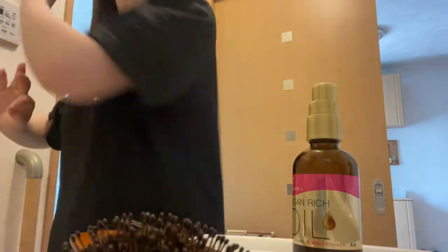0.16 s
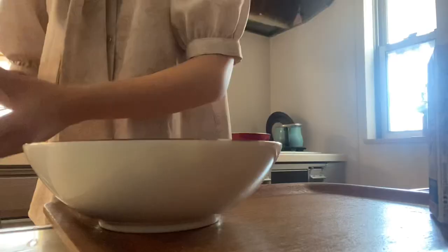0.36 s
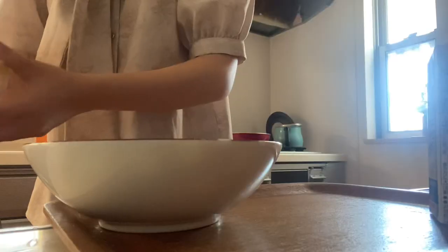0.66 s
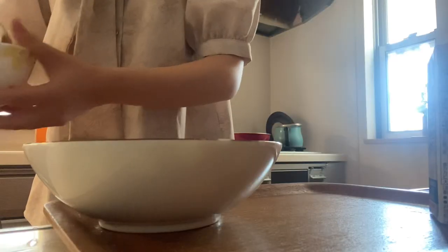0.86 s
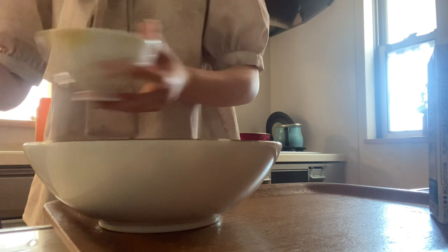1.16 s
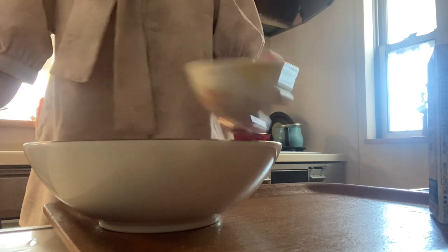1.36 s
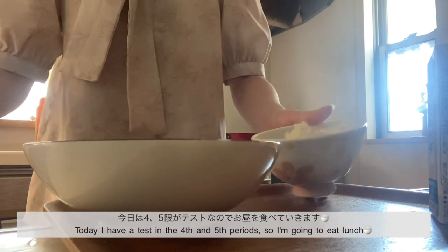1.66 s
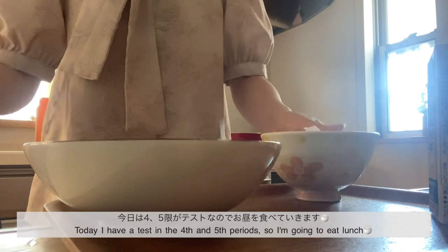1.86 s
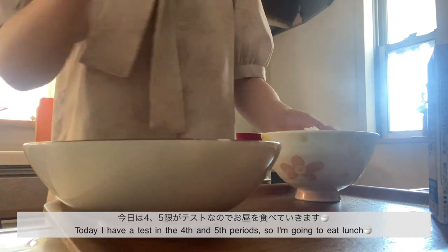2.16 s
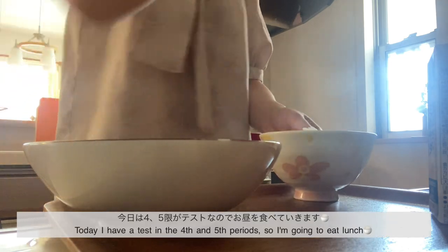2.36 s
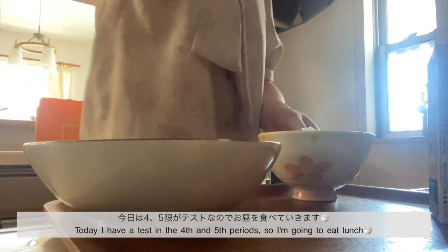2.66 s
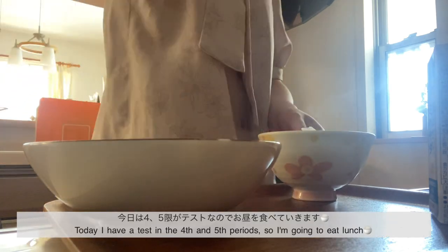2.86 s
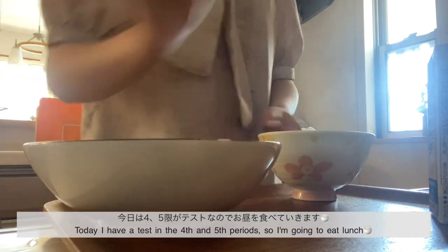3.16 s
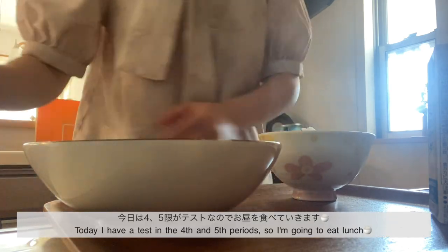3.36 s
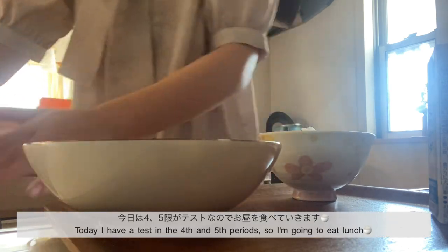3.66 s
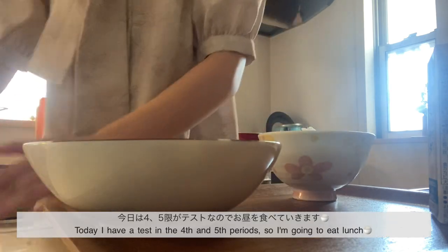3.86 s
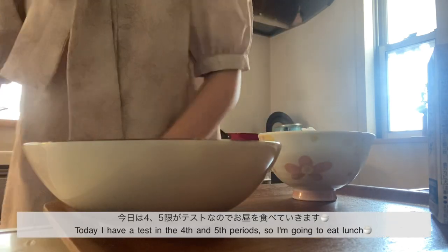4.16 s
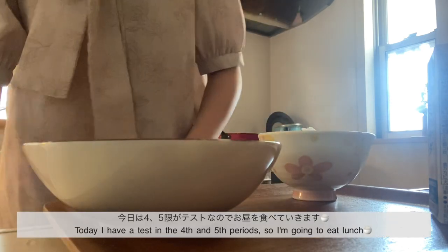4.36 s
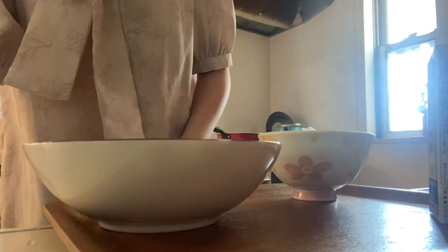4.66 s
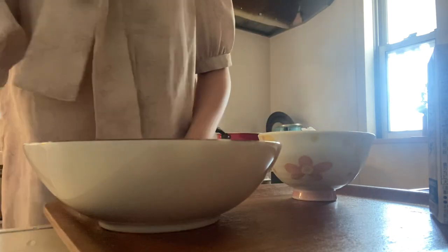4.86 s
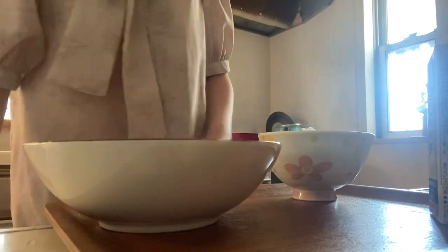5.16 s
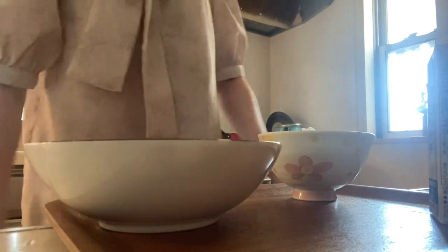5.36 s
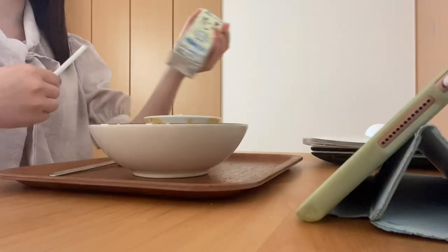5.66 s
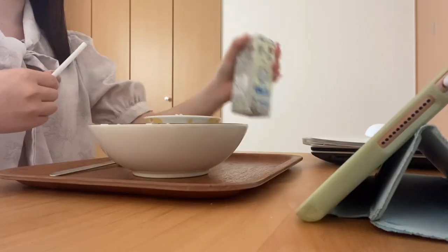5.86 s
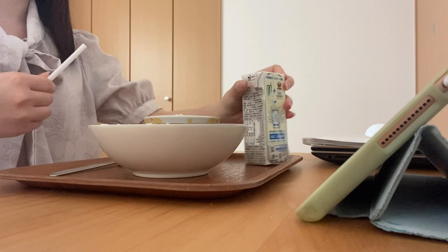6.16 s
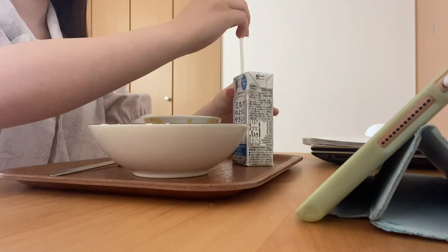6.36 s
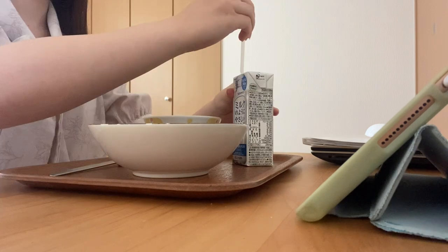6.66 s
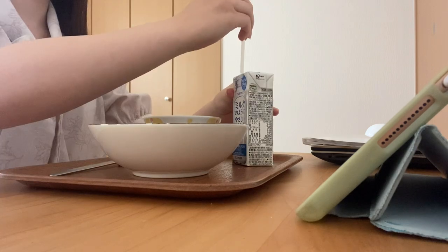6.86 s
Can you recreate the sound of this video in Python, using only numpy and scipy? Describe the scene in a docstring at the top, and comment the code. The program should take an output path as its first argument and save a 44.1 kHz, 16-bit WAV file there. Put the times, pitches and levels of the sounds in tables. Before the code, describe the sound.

Over a low microwave hum, a ceramic bowl knocks onto a counter, tableware clacks, things clatter further off; then quiet, straw clicks, a carton landing.

```python
"""Cloth rustles over quiet room noise; after a hard cut a microwave oven hums, and after a second the hum is gone.
During the hum a bowl is set on a counter, tableware is put down and things clatter further off; after it
a straw clicks and a drink carton lands on a tray, scuffs and rocks to rest, over faint ticking.
Air and cloth are shaped noise, the hum is sums of tones, and each blow is a noise crack plus damped modes;
sliding is a dense train of tiny blows, and a diffuse decaying tail forms the reverberation."""
import sys
import numpy as np
from scipy import signal
from scipy.fft import rfft, irfft, next_fast_len
from scipy.io import wavfile
from scipy.ndimage import uniform_filter1d

SR = 44100
rng = np.random.default_rng(int(sys.argv[2]) if len(sys.argv) > 2 else 0)


def materialize(psi):
    """Save the field psi as 16-bit PCM at rate SR to the path in sys.argv[1].

    A 1-D psi becomes a single channel; in a 2-D psi each row is a channel.
    """
    bounded = np.clip(np.atleast_2d(psi).T, -1, 1)
    quanta = np.round(bounded * 32767).astype(np.int16)
    wavfile.write(sys.argv[1], SR, quanta)


N = 309141
TIME = np.arange(N) / SR
RING_TIME = TIME[:16384]
THIRD_OCTAVES_HZ = 25 * 2 ** (np.arange(29) / 3)
FLAT = [(1, 0), (SR, 0)]  # white spectrum: frequency_hz, density_db


def amp(db):
    """Logarithmic level: decibels to amplitude gain."""
    return 10 ** (np.asarray(db) / 20)


def at_hz(table, hz):
    """Logarithmic frequency scale: interpolate a table along it."""
    table_hz, value = np.transpose(table)
    return np.interp(np.log(np.maximum(hz, 1)), np.log(table_hz), value)


def unit(x):
    """Power normalisation: scale to rms 1."""
    return x / np.sqrt(np.mean(x ** 2))


def pan(db):
    """Interaural level difference: gains for left minus right in dB."""
    return amp(np.array([[db], [-db]]) / 2)


def lean(x, pan_db):
    """Frequency-dependent level difference: full below 700 Hz, nearly none in the treble."""
    n = next_fast_len(N)
    lean_db = pan_db * at_hz([(700, 1.0), (6000, 0.084)], np.fft.rfftfreq(n, 1 / SR))
    gains = amp(np.array([lean_db, -lean_db]) / 2)
    return irfft(rfft(x, n) * gains, n)[:, :N]


def walk(rate):
    """Low-pass random process: a smooth wander from about rate new values a second, spread near 1."""
    k = int(SR / rate)
    steps = np.repeat(rng.standard_normal(N // k + 1), k)
    return 1.3 * uniform_filter1d(uniform_filter1d(steps, k), k)[:N]


def swell(s, rise_s, fall_s):
    """Exponential growth and decay: a movement gathers speed up to time s, then comes to rest."""
    return np.exp(-np.abs(TIME - s) / np.where(TIME < s, rise_s, fall_s))


def air(spectrum, size, port_lag_s=0.0016):
    """Diffuse-field coherence: channels alike in the bass, partly opposed in the middle, unrelated above."""
    n = next_fast_len(size)
    hz = np.fft.rfftfreq(n, 1 / SR)
    mid, side = rfft(rng.standard_normal((2, n)))
    alike = np.clip(np.sinc(2 * hz * port_lag_s) * 2.0, -.95, .97)
    mid = mid * np.sqrt(np.abs(1 + alike))
    side = side * np.sqrt(np.abs(1 - alike))
    colour = amp(at_hz(spectrum, hz))
    return unit(irfft(np.array([mid + side, mid - side]) * colour, n)[:, :size])


def beam(size, lag_s, direct=0.65):
    """Interaural time difference: white noise leads by lag_s on the left, mixed with a diffuse part."""
    hz = np.fft.rfftfreq(size, 1 / SR)
    phase = np.exp(1j * np.pi * hz * lag_s * np.array([[1], [-1]]))
    straight = irfft(rfft(rng.standard_normal(size)) * phase, size)
    return np.sqrt(direct) * straight + np.sqrt(1 - direct) * air(FLAT, size)


def dying_noise(white, spectrum, t60s):
    """Frequency-dependent damping: noise of energy 1 whose third-octave bands die at their own pace."""
    t = TIME[:white.shape[1]]
    hz = np.maximum(np.fft.rfftfreq(len(t), 1 / SR), 1)
    noise, colour, out = rfft(white), amp(at_hz(spectrum, hz)), 0
    for centre in THIRD_OCTAVES_HZ[2:]:
        octaves_off = np.abs(np.log2(hz / centre))
        window = colour * np.sqrt(np.maximum(1 - octaves_off * 3, 0))
        band = irfft(noise * window, len(t)) * amp(-60 * t / at_hz(t60s, centre))
        # restore each band's share of the spectrum after the decay
        out = out + unit(band) * np.linalg.norm(window)
    return unit(out) / np.sqrt(len(t))


def ring(modes, scatter_db=2.5, opposed_hz=320, turn=1.865):
    """Modal superposition: damped modes of energy 1, with a channel phase lag growing to turn radians."""
    bloom_cycles = 1.2  # time constant of a mode's build-up, so the lows arrive late
    out = 0
    for (hz, db, t60), chance in zip(modes, rng.standard_normal((len(modes), 2))):
        lag = turn * min(hz / opposed_hz, 1) ** 2 * np.array([[.5], [-.5]])
        wave = np.sin(2 * np.pi * hz * (1 + 0.0019 * chance[0]) * RING_TIME - lag)
        decay = amp(db + scatter_db * chance[1] - 60 * RING_TIME / t60)
        bloom = 1 - np.exp(-RING_TIME * hz / bloom_cycles)
        out = out + wave * decay * bloom
    return unit(out) / np.sqrt(len(RING_TIME))


def blows(table, crack, support, modes=None, ring_db=0, low_t60=0.17, high_t60=0.041,
          rise_s=0.00057, lag_s=0, grain_db=4.0):
    """Impact excitation: crack, object ring and support thump, dulled by soft contact.

    Returns the direct sound and what enters the room."""
    ring_to_room_db = -10.5  # an object's ring fills the room less than its crack
    size = len(RING_TIME)
    out = np.zeros((2, 2, N + size))
    # the room answers a crack as it would one clean click, with an even wash
    pulse = irfft(amp(at_hz(crack, np.fft.rfftfreq(size, 1 / SR))))
    click = unit(np.roll(pulse, 128)) / np.sqrt(size)
    for s, db, contact_hz, thump_db in table:
        noise = dying_noise(beam(size, lag_s), crack, [(250, low_t60), (4000, high_t60)])
        # after the first clean contact the surfaces chatter, so the crack comes in grains
        chatter = amp(grain_db * walk(900)[:size] * (1.0 - np.exp(-RING_TIME / 0.02)))
        grains = unit(noise * chatter) / np.sqrt(size)
        thump = amp(thump_db) * ring(support)
        tone = 0 if modes is None else amp(ring_db) * ring(modes)
        direct = (grains + thump + tone) * (1 - np.exp(-RING_TIME / rise_s))
        radiated = click + thump + amp(ring_to_room_db) * tone
        softness = signal.butter(1, min(contact_hz, SR * .45), fs=SR)
        start = int(s * SR)
        out[..., start:start + size] += amp(db) * signal.lfilter(*softness, [direct, radiated])
    return out[..., :N]


def follow_ups(table, delay_s, db, crispness, thump_db, growth=1.8):
    """Nonlinear rebound: a second contact after each blow, strong after hard ones, slight after light."""
    hardest = max(row[1] for row in table)
    return [(s + delay_s, hardest + db + growth * (blow_db - hardest), crispness * contact_hz, thump_db)
            for s, blow_db, contact_hz, _ in table]


def rattles(table, gap_s, db, step_db, count):
    """Repeated lossy impact: loose things chatter at uneven gaps, each contact weaker than the last."""
    chance = rng.uniform(.5, 1.5, (len(table), count))
    return [(s + delay, blow_db + db + k * step_db, contact_hz, thump_db)
            for (s, blow_db, contact_hz, thump_db), gaps in zip(table, chance)
            for k, delay in enumerate(gap_s * np.cumsum(gaps))]


def scrape(crack, modes, rate, ring_db, spread_db=1.9):
    """Stick-slip friction: uneven catches, rate per second on average, each a crack that rings the object."""
    catch_t60_s = 0.023
    size_db = spread_db * np.minimum(rng.exponential(size=N), 4)
    catches = (rng.random(N) < rate / SR) * amp(size_db)
    noise = dying_noise(air(FLAT, len(RING_TIME)), crack, [(1, catch_t60_s)])
    grain = noise + amp(ring_db) * ring(modes)
    return unit(signal.fftconvolve(catches[None], grain, axes=1)[:, :N])


# Reverberation time of the room: frequency_hz [Hz], t60_s [s]
REVERBERATION = [(100, 0.49), (500, 0.29), (2300, 0.39), (6000, 0.35), (14000, 0.12)]


def room(sound, wet_db, bass_db):
    """Reverberation: direct sound plus a diffuse tail that builds over the first wall echoes."""
    direct, radiated = sound
    t = TIME[:32768]
    tail = dying_noise(air(FLAT, len(t)), [(100, bass_db), (1000, 0.0022)], REVERBERATION)
    tail = tail * (1 - np.exp(-t / 0.0016))
    return direct + amp(wet_db) * signal.fftconvolve(radiated, tail, axes=1)[:, :N]


# Noise spectrum of the first room: frequency_hz [Hz], relative density_db [dB per Hz]
FIRST_ROOM_NOISE = [(30, -15.5), (81, 2.5), (171, -10), (735, -4), (1480, -22.5), (8690, -38.5),
                    (15000, -74)]


def first_room():
    """Stationary broadband noise: the room tone before the hum."""
    return amp(-49.5) * air(FIRST_ROOM_NOISE, N) * pan(-2.6)


# Noise spectrum of the last room: frequency_hz [Hz], relative density_db [dB per Hz]
LAST_ROOM_NOISE = [(30, -7), (80, -9), (135, -2), (175, -13), (240, -12.5), (420, -13.5), (700, -27),
                   (1200, -35.5), (1900, -40.5), (4300, -58), (4800, -38), (5500, -67), (15000, -73.5)]


def last_room():
    """Stationary broadband noise: the fainter room tone after the hum."""
    return amp(-61.5) * air(LAST_ROOM_NOISE, N) * pan(-9.5)


# Transformer tones: pitch_hz [Hz], rms level_db before panning [dB], left minus right pan_db [dB]
TRANSFORMER_TONES = [(60.6, -40.5, -1.55), (237.5, -52.5, -7)]
# Fan tones: pitch_hz [Hz], rms level_db before panning [dB], left minus right pan_db [dB], unsteadiness [0-1]
FAN_BLADE_TONES = [(150, -51, -8.5, .4), (170, -40, -6.5, .12), (343, -53.5, 7, 1)]
# Fan air with a narrow treble whistle: frequency_hz [Hz], relative density_db [dB per Hz]
FAN_AIR = [(25, -36.5), (45, -15), (105, -9), (130, -3), (215, -1.5), (285, -8), (350, -3.5), (420, -11),
           (540, -11.5), (950, -20.5), (1600, -28), (2090, -36), (2235, -23.5), (2390, -34.5), (3700, -41),
           (6000, -55.5), (15000, -70.5)]


def microwave():
    """Tonal and flow noise: steady mains hum and fluttering, drifting fan tones over the rush of air."""
    fan_drift, hum_lead_s = .006, 0.0001  # share of fan speed; the tones reach the left channel first
    out = amp(-43.5) * air(FAN_AIR, N) * pan(-3.0) * amp(1.2 * walk(8.3))
    clock = TIME + hum_lead_s * np.array([[1], [0]])
    for hz, db, pan_db in TRANSFORMER_TONES:
        tone = np.cos(2 * np.pi * (hz * clock + rng.random()))
        out = out + amp(db) * unit(tone) * pan(pan_db)
    fan_clock = clock + np.cumsum(fan_drift * walk(2)) / SR
    for hz, db, pan_db, unsteady in FAN_BLADE_TONES:
        flutter = 1 + unsteady * (walk(hz / 10) + 1j * walk(hz / 10))
        tone = np.real(flutter * np.exp(2j * np.pi * (hz * fan_clock + rng.random())))
        out = out + amp(db) * unit(tone) * pan(pan_db)
    return out


# Runs of even ticks: start_s [s], end_s [s], relative level_db before tick shape and scatter [dB]
TICKS = [(5.614, 6.41, -63), (6.413, 6.98, -65)]


def ticking(hz=1900, rise_s=0.0043):
    """Amplitude modulation of band noise: faint soft-edged ticks, eight a second, of uneven strength."""
    rate_hz = 8
    ticks = [(s, db) for first, end, db in TICKS for s in np.arange(first, end, 1 / rate_hz)]
    times, db = np.transpose(ticks)
    age = np.maximum(TIME[:, None] - times, 0) / rise_s
    strength = amp(db + 2 * rng.standard_normal(len(db)))
    envelope = np.sum(strength * age * np.exp(-age), axis=1)
    # the doubled point makes a sudden step down above hz
    spectrum = [(hz / 2, -18), (hz * 0.87, -7), (hz, 0), (hz * 1.0, -11), (hz * 2, -32)]
    return envelope * air(spectrum, N)


# Arm movements brushing sleeves and apron: fastest_s [s], level_db before flicker [dB], rise_s [s], fall_s [s]
ARM_STROKES = [(.3, -65.5, 0.054, 0.037), (1.129, -76.5, 0.049, 0.14), (2.236, -62, 0.03, 0.042),
               (3.481, -74, 0.15, 0.1)]


def cloth():
    """Friction noise: fabric hisses in small uneven catches, swelling with each arm movement."""
    rest_db = -84  # fabric stirring between the movements
    strokes = sum(amp(db) * swell(s, rise_s, fall_s) for s, db, rise_s, fall_s in ARM_STROKES)
    motion = amp(rest_db) + strokes
    hiss = air([(500, -18.0), (2000, -1.0), (8500, 1), (15000, -25)], N)
    return motion * amp(2 * walk(35)) * hiss


# Crack of far surfaces: frequency_hz [Hz], relative density_db [dB per Hz]
FAR_SURFACE_CRACK = [(100, -5.5), (350, 3.5), (550, 3.5), (700, 1), (1000, 7.5), (1350, 6), (1700, -2.5),
                     (2200, 1.5), (2900, -5.5), (7000, -9), (13500, -14), (15300, -20)]
# Modes of the dragged thing: pitch_hz [Hz], relative level_db [dB], t60_s [s]
SLIDER_MODES = [(1280, 0, 0.024), (1490, -1, 0.016)]


def shelf_slide():
    """Stick-slip friction: one push drags something over a shelf, faster until it is stopped."""
    push = amp(-45.5) * swell(4.765, rise_s=0.2, fall_s=0.046)
    return push * scrape(FAR_SURFACE_CRACK, SLIDER_MODES, rate=1200, ring_db=4.5)


# Blow columns below: start_s, level_db before the source's gain, contact_hz (low-pass), thump_db re the blow.
# Knocks on the shelf: start_s [s], level_db [dB], contact_hz [Hz], thump_db [dB]
SHELF_KNOCKS = [(3.832, -18.5, 1800, 5.5), (4.206, -4.5, 3500, 4.5), (4.283, -16.5, 5000, -4),
                (4.697, -21, 6000, 13), (4.7631, -1, 18100, -1), (4.824, -18, 2500, 0),
                (4.855, -5, 5100, 2.5), (4.888, -13, 119, 16), (5.059, -18, 3000, -8)]
# Thin clicks: start_s [s], level_db [dB], contact_hz [Hz], thump_db [dB]
THIN_CLICKS = [(3.654, -37.5, 5000, -17), (4.54, -21.5, 4900, -1)]
# Blow on a hollow vessel: start_s [s], level_db [dB], contact_hz [Hz], thump_db [dB]
VESSEL_KNOCKS = [(4.351, -10.5, 900, 2)]
# Modes of things on the shelf: pitch_hz [Hz], relative level_db [dB], t60_s [s]
SHELF_MODES = [(544, 4, 0.12), (967, -2, 0.091), (1334, -1, 0.038), (1455, -4, 0.046)]
# Modes of the hollow vessel: pitch_hz [Hz], relative level_db [dB], t60_s [s]
VESSEL_MODES = [(924, -1, 0.27), (1136, 0, .1)]
# Modes of the supporting cabinet: pitch_hz [Hz], relative level_db [dB], t60_s [s]
CABINET_MODES = [(89, -4, 0.15), (128.8, -3.5, 0.13), (160.2, -1.5, 0.088), (220.5, 0.5, 0.065),
                 (351, -9.5, 0.15)]
# Crack of thin plastic, also used by the straw: frequency_hz [Hz], relative density_db [dB per Hz]
PLASTIC_CRACK = [(200, 4), (2200, -2.5), (7000, 2), (13000, -3.5), (16000, -5)]


def clatter():
    """Reverberant impacts: far things knock and rattle with strong room sound; a hollow vessel rings."""
    hard = [row for row in SHELF_KNOCKS if row[1] > -7.5]  # dB; only these shake loose things
    loose = rattles(hard, gap_s=.011, db=-8.5, step_db=-2.5, count=3)
    knocks = blows(SHELF_KNOCKS + loose, FAR_SURFACE_CRACK, CABINET_MODES, SHELF_MODES, ring_db=-1.5,
                   low_t60=0.14, high_t60=0.041, rise_s=0.00093, lag_s=0.000688, grain_db=5.5)
    vessel = blows(VESSEL_KNOCKS, FAR_SURFACE_CRACK, CABINET_MODES, VESSEL_MODES, ring_db=1.5)
    clicks = blows(THIN_CLICKS, PLASTIC_CRACK, CABINET_MODES)
    return amp(8.0) * lean(room(knocks + vessel + clicks, wet_db=-3.0, bass_db=-2.5), pan_db=-2.5)


# Clicks of the straw: start_s [s], level_db [dB], contact_hz [Hz], thump_db [dB]
STRAW_SNAPS = [(5.472, -7.5, 15300, -33), (5.581, -12.5, 18100, -22), (5.591, -35, 18000, -22),
               (5.881, -23.5, 6900, -20)]
# Modes of the tray, also under the carton: pitch_hz [Hz], relative level_db [dB], t60_s [s]
TRAY_MODES = [(47.6, 1, 0.16), (67.4, -13, 0.19), (117, 3, 0.072), (137.3, -2.5, 0.11)]


def straw():
    """Short broadband transients: the drinking straw snaps out in crisp clicks."""
    clicks = blows(STRAW_SNAPS, PLASTIC_CRACK, TRAY_MODES, low_t60=0.018, high_t60=0.0087, rise_s=0.00027)
    return amp(-8.5) * room(clicks, wet_db=-2.0, bass_db=-5.0)


# Contacts of carton and tray: start_s [s], level_db [dB], contact_hz [Hz], thump_db [dB]
CARTON_KNOCKS = [(6.027, -12.5, 4440, -10), (6.075, -30.5, 600, 12.5), (6.169, -29.5, 2200, 9),
                 (6.206, -33, 5000, 4), (6.217, -42, 1503, 24), (6.275, -40, 30, 17.5),
                 (6.364, -56, 3000, -10)]
# Modes of the carton: pitch_hz [Hz], relative level_db [dB], t60_s [s]
CARTON_MODES = [(403.4, 3.5, .075), (640, 2.5, 0.015), (840, -3, 0.051), (1330, -11, 0.047),
                (2360, -14, 0.032)]
# Crack of the sliding carton: frequency_hz [Hz], relative density_db [dB per Hz]
SCUFF_NOISE = [(100, 2), (400, 10), (950, -11), (2400, -35), (15000, -49)]


def carton_scuff():
    """Stick-slip friction: the landed carton scuffs over the tray in small catches until it stands."""
    drag = swell(6.17, rise_s=0.17, fall_s=0.06) * (TIME > CARTON_KNOCKS[0][0])
    return amp(-38) * drag * scrape(SCUFF_NOISE, CARTON_MODES, rate=1400, ring_db=2) * pan(-2.5)


# Crack of the landing carton: frequency_hz [Hz], relative density_db [dB per Hz]
CARTON_NOISE = [(100, 5.5), (450, 13.5), (950, 6.5), (1500, 3), (2300, -8.5), (4500, -21.5), (15000, -24)]


def carton():
    """Damped impact: the carton lands, its weight follows with a duller contact, and it rocks to rest."""
    weight = follow_ups(CARTON_KNOCKS[:1], delay_s=0.00692, db=-16.5, crispness=0.17, thump_db=19)
    knocks = blows(CARTON_KNOCKS + weight, CARTON_NOISE, TRAY_MODES, CARTON_MODES, ring_db=-3.5,
                   low_t60=0.059, high_t60=0.022, rise_s=0.00034, lag_s=-0.00027)
    return amp(13.0) * lean(room(knocks, wet_db=-8.5, bass_db=2), pan_db=-5.5)


# Touches of the utensil: start_s [s], level_db [dB], contact_hz [Hz], thump_db [dB]
UTENSIL_TAPS = [(2.649, -17, 9050, 11.5), (2.675, -6.5, 9050, 5.7)]
# Contacts of the tableware: start_s [s], level_db [dB], contact_hz [Hz], thump_db [dB]
WARE_CLACKS = [(2.706, -1, 4520, -5), (2.7115, -8.5, 2940, -6.5)]
# Modes of the utensil: pitch_hz [Hz], relative level_db [dB], t60_s [s]
UTENSIL_MODES = [(2400, 4.5, 0.028), (3614, -6, 0.13), (5030, 3, 0.023), (7880, -10, 0.12),
                 (9440, -12.5, .09), (12880, -15, .1)]
# Modes of the tableware: pitch_hz [Hz], relative level_db [dB], t60_s [s]
WARE_MODES = [(730, -7.5, 0.068), (915, -0.5, .045), (1534, 4, 0.074), (2060, -8, 0.04), (2240, -1, 0.045),
              (2310, 1.5, 0.042), (3046, 1.5, 0.032), (3700, -2, 0.04)]
# Modes of the support under both: pitch_hz [Hz], relative level_db [dB], t60_s [s]
WARE_SUPPORT = [(95, -7.5, 0.12), (179.5, -1, 0.14), (346, -5.5, 0.15), (474, 0.5, 0.035),
                (534, 4.5, 0.0401)]
# Crack of the tableware: frequency_hz [Hz], relative density_db [dB per Hz]
WARE_NOISE = [(300, 0.5), (1500, 1.5), (3500, -1.5), (6000, -14), (16000, -32)]
# Crack of ceramic, for utensil and bowl: frequency_hz [Hz], relative density_db [dB per Hz]
CERAMIC_NOISE = [(100, 0), (420, 7.5), (800, 2.5), (1500, 0), (2500, -7), (3700, -5), (5000, -9.5),
                 (6200, -14), (8800, -17), (16000, -38)]


def tableware():
    """Modal ringing after impact: a utensil touches down twice, thinly ringing, then tableware clacks."""
    taps = blows(UTENSIL_TAPS, CERAMIC_NOISE, WARE_SUPPORT, UTENSIL_MODES, ring_db=-2.5,
                 low_t60=0.04, high_t60=0.04, rise_s=0.00082, lag_s=0.000389, grain_db=1)
    clack = blows(WARE_CLACKS, WARE_NOISE, WARE_SUPPORT, WARE_MODES, ring_db=2.0,
                  low_t60=0.032, high_t60=0.073, rise_s=0.00017, lag_s=0.000777)
    return amp(13) * lean(room(taps + clack, wet_db=-10.0, bass_db=-12), pan_db=-6.0)


# Contacts of bowl and counter: start_s [s], level_db [dB], contact_hz [Hz], thump_db [dB]
BOWL_KNOCKS = [(1.587, -30, 13020, -6), (1.6125, -1.5, 5800, -1), (1.7205, 0.5, 5830, -2.5),
               (1.8625, -17.5, 1510, 7), (1.875, -19.5, 9000, 12.5), (1.884, -29.5, 250, 18.5)]
# Modes of the ceramic bowl: pitch_hz [Hz], relative level_db [dB], t60_s [s]
BOWL_MODES = [(553, 1, 0.07), (701, -0.5, 0.1), (1021, 5, 0.08), (1330, 4.5, 0.12), (1534, 9.5, 0.042),
              (2600, -17.5, 0.12), (3575, -20, 0.19), (3870, -5.5, 0.06)]
# Modes of the counter: pitch_hz [Hz], relative level_db [dB], t60_s [s]
COUNTER_MODES = [(91.44, 2.5, 0.18), (131, 3, 0.15), (183.5, -8.5, 0.15), (243, -3.5, 0.1), (310, -3, 0.1),
                 (407, 5, 0.048), (537, 5.5, 0.067)]


def bowl():
    """Coupled impact and rebound: the near bowl knocks twice, wobbles after each and settles on its foot."""
    rebounds = follow_ups(BOWL_KNOCKS, delay_s=0.0041, db=-9, crispness=0.26, thump_db=5.5)
    wobble = follow_ups(BOWL_KNOCKS[1:3], delay_s=0.026, db=-19.5, crispness=0.15, thump_db=-1.5)
    knocks = blows(BOWL_KNOCKS + rebounds + wobble, CERAMIC_NOISE, COUNTER_MODES, BOWL_MODES, ring_db=-3.5,
                   low_t60=0.079, high_t60=0.028, rise_s=0.00044, lag_s=-0.000588)
    return amp(16.5) * lean(room(knocks, wet_db=-16.5, bass_db=-4), pan_db=-4.5)


def scene():
    """Superposition: backgrounds switch at two hard cuts, and all other sources add to them."""
    kitchen_start_s, kitchen_end_s = .372, 5.472
    before, after = TIME < kitchen_start_s, TIME > kitchen_end_s
    background = np.where(before, first_room(), np.where(after, last_room(), microwave()))
    far = ticking() + cloth() + shelf_slide() + clatter()
    drink = straw() + carton_scuff() + carton()
    return background + far + drink + tableware() + bowl()


def record(dry):
    """Band limiting and clipping: drop deep rumble, hold peaks at full scale, cut the top."""
    dry = signal.sosfilt(signal.butter(4, 38, "high", fs=SR, output="sos"), dry)
    top_cut = signal.ellip(10, .2, 80, 15600, fs=SR, output="sos")
    return signal.sosfilt(top_cut, np.clip(dry, -1, 1))


dry = scene()
out = record(dry)
materialize(out)
```